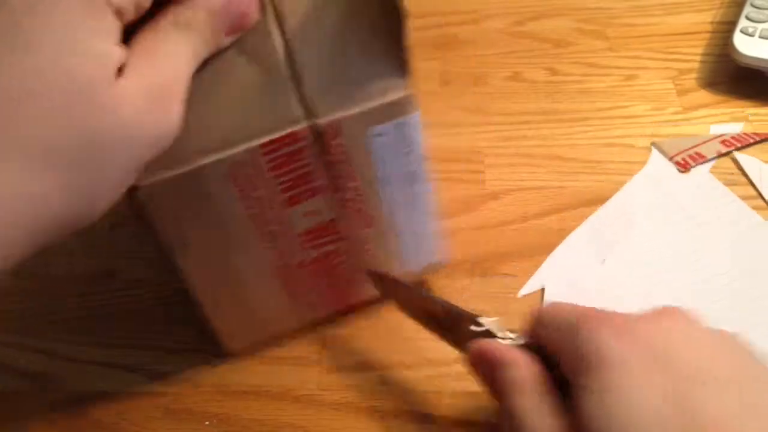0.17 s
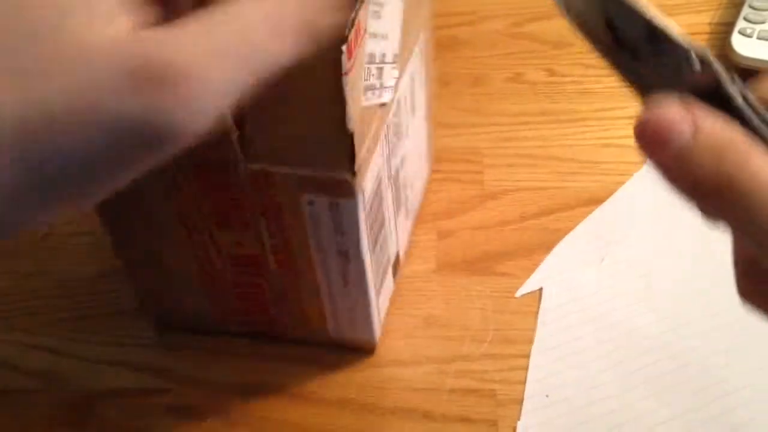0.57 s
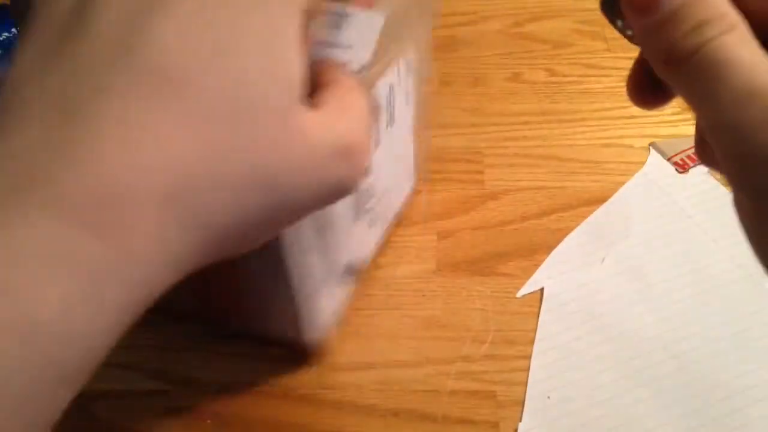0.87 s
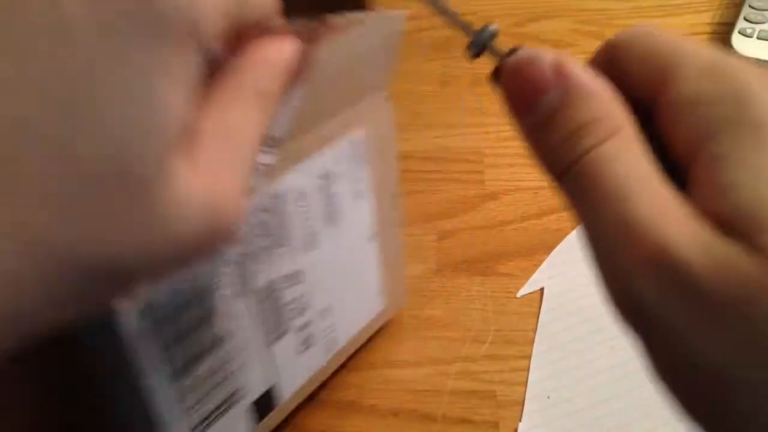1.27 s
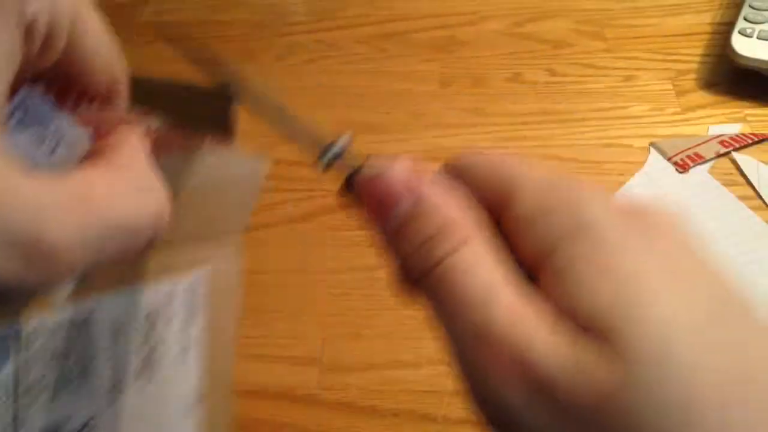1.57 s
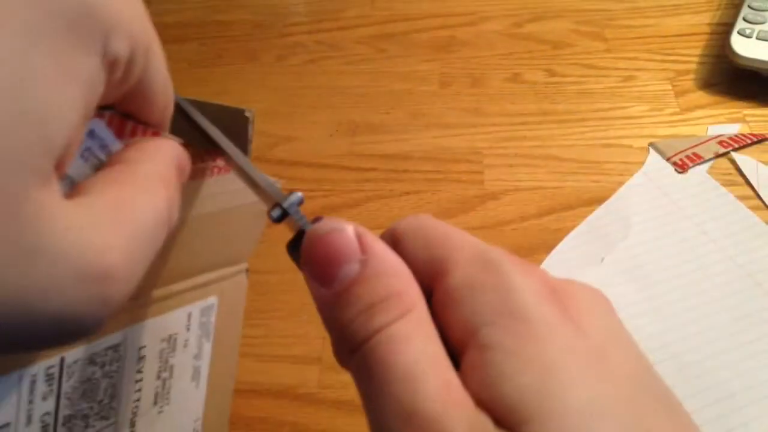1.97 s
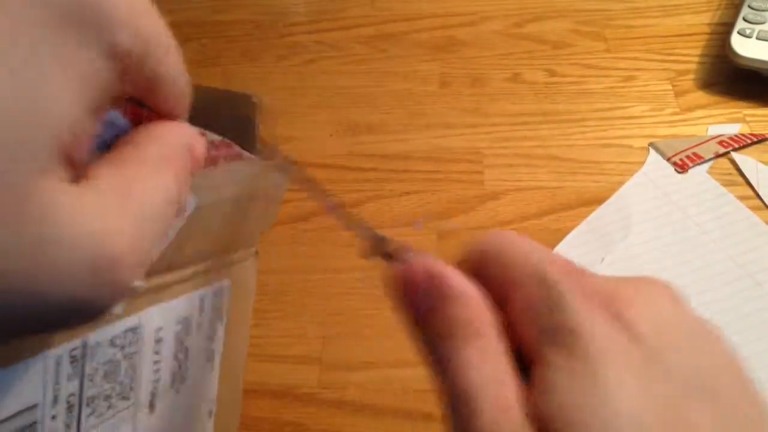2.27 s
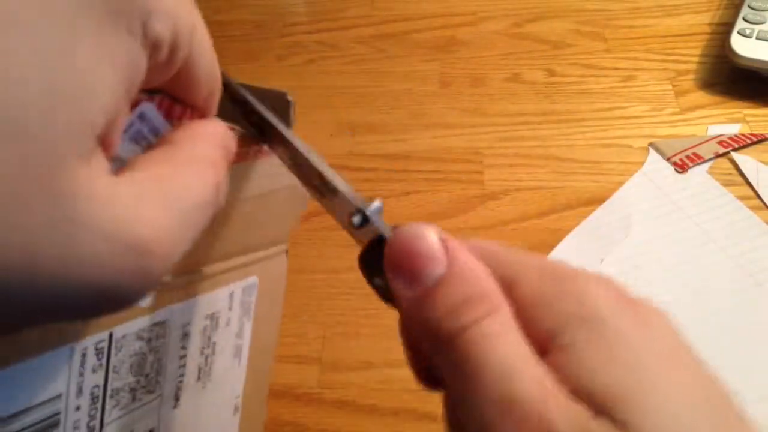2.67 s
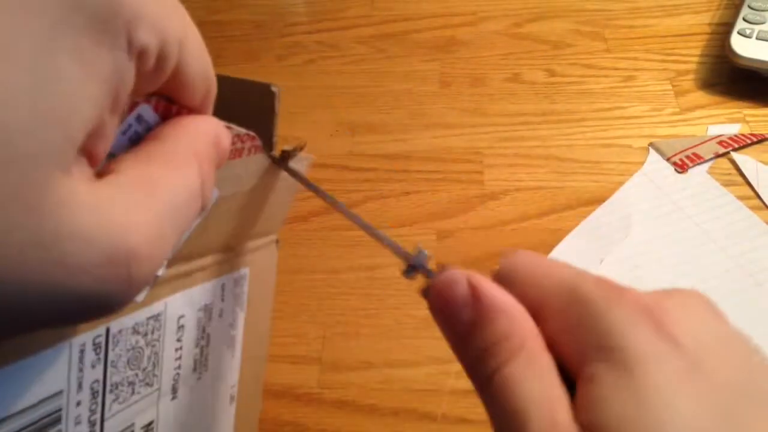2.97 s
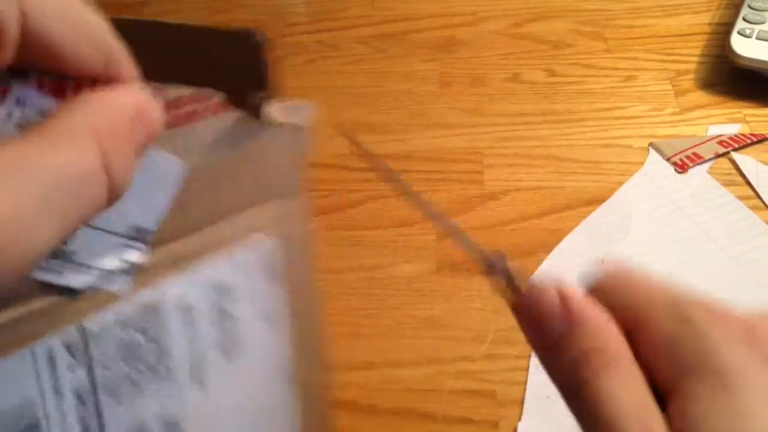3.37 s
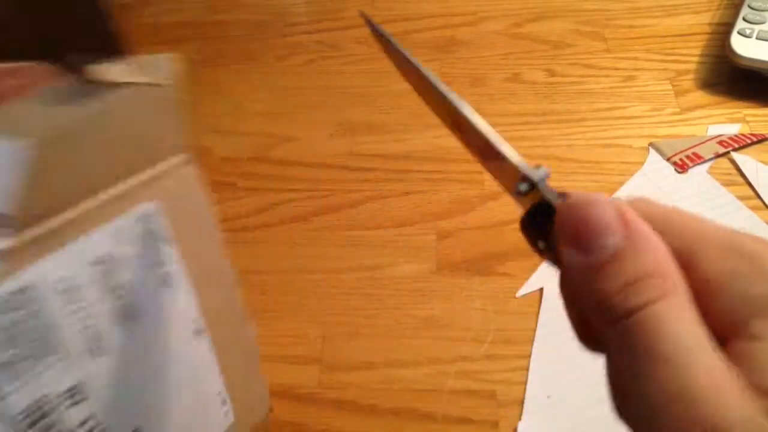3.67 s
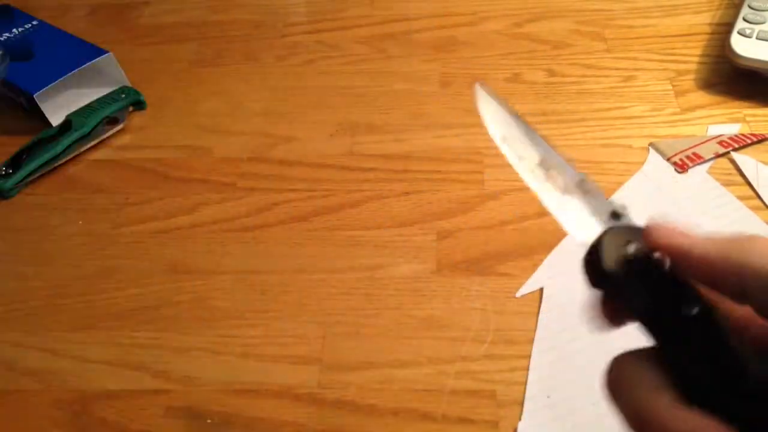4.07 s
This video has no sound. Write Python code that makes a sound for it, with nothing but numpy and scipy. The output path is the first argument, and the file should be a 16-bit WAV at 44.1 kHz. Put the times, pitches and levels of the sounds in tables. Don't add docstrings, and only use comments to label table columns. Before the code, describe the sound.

A small cardboard box is cut by hand with a knife, heard close with a short indoor echo. A crisp rip opens, followed by light scraping, dull knocks and small ticks. Past the middle, louder gritty cuts and hard snaps cluster together, then only faint scuffs and quiet room hiss remain.

```python
import sys
import numpy as np
from scipy import signal
from scipy.fft import rfft, irfft, next_fast_len
from scipy.io import wavfile

SR = 44100
rng = np.random.default_rng(int(sys.argv[2]) if len(sys.argv) > 2 else 0)


def inscribe(sig):
    pcm = np.round(np.clip(np.atleast_2d(sig).T, -1, 1) * 32767)
    wavfile.write(sys.argv[1], SR, pcm.astype(np.int16))


def ratio(d):
    e = np.asarray(d, float) / 20
    return 10 ** e


N = 185352

# pitch_hz, width_hz, level_db
HOLLOW_MODES = [(60.4, 46, -13.5), (96.5, 79, -8.5), (125, 30, -3), (152.2, 27, -3.5), (199.3, 41, 0),
                (257.6, 85, -3.5), (312, 89, -4), (406, 27, -4)]
# pitch_hz, width_hz, level_db
WALL_MODES = [(475.4, 52, 0.5), (639, 47, 4), (752, 170, -4), (980, 106, 3), (1130, 205, -3),
              (1299, 102, 2.5), (1487, 213, -4), (1798, 86, -0.5), (2095, 270, -10)]
# pitch_hz, width_hz, level_db
EDGE_MODES = [(2318, 95, 2.5), (3113, 920, -1), (3510, 590, 2), (4090, 320, 0)]
# pitch_hz, level_db (per Hz)
FIBRE_COLOUR = [(2650, -19.5), (4500, -1), (7710, -3), (8770, -4.5), (10000, -6), (14700, -9.5), (15500, 0)]


def rms_one(x):
    return x / np.sqrt(np.mean(x ** 2) + 1e-20)


def drift(rate_hz):
    r = np.exp(-2 * np.pi * rate_hz / SR)
    settle = 9000
    return rms_one(signal.lfilter([1], [1, -2 * r, r * r], rng.standard_normal(N + settle))[settle:])


def resonance(x, hz, width_hz):
    r = np.exp(-np.pi * width_hz / SR)
    feedback = [1, -2 * r * np.cos(2 * np.pi * hz / SR), r * r]
    return signal.lfilter([(1 - r * r) / 2, 0, (r * r - 1) / 2], feedback, x + 1e-18)


def body(x, modes):
    return sum((-1) ** k * ratio(db) * resonance(x, hz, width) for k, (hz, width, db) in enumerate(modes))


def coloured(x, spectrum):
    size = next_fast_len(N)
    hz, db = np.transpose(spectrum)
    bins_hz = np.arange(size // 2 + 1) * SR / size
    gain = ratio(np.interp(np.log(bins_hz + 1), np.log(hz), db))
    return irfft(rfft(x, size) * gain, size)[:N]


def flexing():
    # start_s, hold_s, force_db
    squeezes = [(0.0, 0.1, -53), (0.217, .13, -48), (0.564, .02, -59), (0.696, .02, -51),
                (0.77, .14, -50.5), (0.997, 0.21, -51.5), (1.506, 0.094, -57), (1.7, .1, -67),
                (1.894, .03, -58.5), (2.17, .02, -48), (2.215, 0.043, -33.5), (2.314, .01, -35.5),
                (2.454, 0.015, -47.5), (2.8, .03, -42.5), (3.064, .01, -56), (3.238, .02, -38.5),
                (3.68, .04, -82)]
    rise_db_per_s, fall_db_per_s, rest_db = 216, 296.5, -78
    t = np.arange(N) / SR
    force_db = np.full(N, float(rest_db))
    for start, hold, db in squeezes:
        rising = rise_db_per_s * np.maximum(start - t, 0)
        falling = fall_db_per_s * np.maximum(t - start - abs(hold), 0)
        force_db = np.maximum(force_db, db - rising - falling)
    return ratio(force_db)


def hush():
    # pitch_hz, level_db
    air_colour = [(18, -64), (30, -26.5), (192, 1), (767, -13.5), (874, -9.5), (2180, -12.5), (4420, -16),
                  (6540, -18.5), (15500, -20)]
    air_db, rumble_db, rumble_top_hz = -63.5, -38, 90
    air = rms_one(coloured(rng.standard_normal(N), air_colour))
    low_pass = signal.butter(2, rumble_top_hz, fs=SR, output="sos")
    rumble = rms_one(signal.sosfilt(low_pass, rng.standard_normal(N)))
    rumble_level = ratio(rumble_db + 2.1 * drift(6.6)) * flexing() ** 0.5
    return ratio(air_db) * air + rumble_level * rumble


def room(x):
    t60_s, dulling_hz = 0.36, 8200
    size = next_fast_len(N + SR)
    hz = np.arange(size // 2 + 1) * SR / size
    tail = 0
    for k, lag_s in enumerate(rng.uniform(.008, .035, 10)):
        loss = ratio(-60 * lag_s / t60_s * (2.5 + hz / dulling_hz))
        loop = loss * np.exp(-2j * np.pi * hz * lag_s)
        tail = tail + (-1) ** k * loop / (1 - loop)
    for lag_s in (.0013, .0029, .0047):
        late = np.exp(-2j * np.pi * hz * lag_s)
        tail = tail * (late - .6) / (1 - .6 * late)
    return irfft(rfft(x, size) * tail, size)[:N]


def squeaks():
    # centre_s, length_s, pitch_hz, level_db
    squeak_table = [(0.092, 0.046, 3450, -48.5), (.133, 0.018, 3500, -41), (.135, .019, 1750, -47),
                    (0.093, 0.063, 630, -48), (.286, 0.0067, 2880, -43), (0.345, 0.004, 1690, -27),
                    (0.361, .028, 1790, -41.5), (0.404, 0.024, 1930, -43.5), (0.463, 0.043, 1830, -56),
                    (0.618, 0.04, 2320, -59.5), (0.845, .0088, 1790, -50), (1.085, 0.0082, 2840, -50.5),
                    (1.136, 0.007, 122.8, -29.5), (1.744, 0.0036, 362, -30.5), (1.824, 0.023, 610, -59),
                    (2.247, 0.026, 201, -29.5), (2.339, 0.0035, 1130, -19), (2.342, 0.0025, 4200, -27),
                    (2.345, .011, 1680, -28.5), (2.349, 0.03, 708, -33.5), (2.6608, 0.00062, 1406, -22),
                    (2.6603, .0014, 3700, -43), (2.662, 0.0011, 516, -19), (2.665, 0.0071, 310, -30.5),
                    (2.808, .016, 372, -28.5), (2.986, 0.0058, 1750, -31.5), (3.234, 0.016, 8100, -41),
                    (3.308, .012, 622, -30), (3.248, 0.0061, 966, -33), (3.432, .014, 940, -55),
                    (3.914, 0.0069, 2110, -51.5)]
    t, out, noise = np.arange(N) / SR, np.zeros(N), rng.standard_normal(N)
    for s, length, hz, db in squeak_table:
        at = slice(max(round((s - .1) * SR), 0), round((s + .1) * SR))
        tone = resonance(resonance(noise[at], hz, .2 * hz), hz, .2 * hz)
        swell = np.exp(-((t[at] - s) / length) ** 2)
        squeak = tone * swell
        out[at] += ratio(db) * squeak * np.sqrt(np.sum(swell ** 2) / np.sum(squeak ** 2))
    return out


def contacts(table, shape, push_share, boom_gain_db, fibre_gain_db, fibre_power, cut_ratio):
    size = int(.14 * SR)
    t = np.arange(size) / SR
    rattles = rng.standard_normal((len(table), size)) * ratio(1.5 * drift(150)[:size])
    strengths_db = rng.normal(0, 2.5, (len(table), len(HOLLOW_MODES)))
    out, hiss = np.zeros((2, N + size))
    push = np.sin(np.pi * np.clip(t / 0.0024, 0, 1)) ** 2
    dull = signal.butter(2, 600, fs=SR, output="sos")
    for row, rattle, strength in zip(table, rattles, strengths_db):
        s, wall_db, boom_db, fibre_db, hz, length = row
        at = slice(round(s * SR), round(s * SR) + size)
        swell = shape(t, np.clip(length, .003, .1))
        force = rattle * swell

        soft = signal.butter(3, min(cut_ratio * hz, 4000), fs=SR, output="sos")
        grip = 1.1 * resonance(force, hz, hz * 0.17)
        broad = 0.057 * resonance(force, 1420, 2500)
        ring = signal.sosfilt(soft, 0.51 * body(force, WALL_MODES) + grip + broad)
        out[at] += ratio(wall_db - 2.5) * ring / np.abs(ring).max()

        panels = [(f, width, db + extra) for (f, width, db), extra in zip(HOLLOW_MODES, strength)]
        boom = signal.sosfilt(dull, body(push_share * push + force, panels))
        out[at] += ratio(boom_db + boom_gain_db) * boom / np.abs(boom).max()

        hiss[at] += ratio(fibre_db + fibre_gain_db) * rattle * swell ** fibre_power
    bright = coloured(hiss[:N], FIBRE_COLOUR) + ratio(5.5) * body(hiss[:N], EDGE_MODES)
    return out[:N] + bright / np.std(coloured(rattles.ravel(), FIBRE_COLOUR))


def knock_rows():
    # start_s, strength_db, hollow_weight_db, grit_db
    bumps = [(0.591, -47, 5, -11), (0.632, -41.5, 2, -15), (0.653, -44, 1, -28), (.78, -43, 12.5, -19),
             (0.8, -40.5, 10.5, -16), (.823, -28, -0.5, -16), (.853, -47, 8.5, -25), (1.026, -33, -3, -42),
             (1.04, -32.5, -2, -13), (1.1245, -23, -4, -15.5), (1.147, -30, -9.5, -11),
             (1.459, -45, 10, -21), (1.49, -41.5, -1.5, -19), (3.376, -40, 3, -19),
             (3.563, -55.5, 0.5, -14), (3.952, -41.5, -19, -17.5)]
    # start_s, strength_db, pitch_hz
    ticks = [(0.432, -36, 815), (1.218, -41, 595), (1.243, -34.5, 534), (1.269, -36.5, 900),
             (1.289, -35.5, 865), (1.309, -38, 704), (1.328, -42, 457), (1.355, -41.5, 724),
             (1.472, -38, 840), (1.543, -48, 920), (1.559, -41, 880), (1.939, -49.5, 450),
             (2.399, -32, 684), (2.499, -48, 1230), (2.833, -25, 436), (3.779, -44, 670), (3.894, -42, 587),
             (4.012, -70, 660)]
    # start_s, strength_db, pitch_hz,
    # grit_db, dying_s
    catches = [(1.737, -25, 339, -32, 0.03), (2.29, -26, 500, -9, 0.023), (2.3, -15.5, 514, -36, .012),
               (2.34, -18.5, 1540, -6, 0.042), (2.374, -23, 426, -26, 0.022),
               (2.6582, -11.5, 608, -36.5, 0.023), (2.947, -23, 1100, -13.5, 0.049),
               (3.1653, -19, 930, -11.5, 0.014), (3.243, -13.5, 890, -11.5, 0.01),
               (3.298, -21.5, 570, -11.5, 0.006), (3.402, -29.5, 844, -13, 0.025)]
    rows = [(s, db, db + weight, db + grit, 517, 0.13) for s, db, weight, grit in bumps]
    rows += [(s, db, db - 10, db - 22.5, hz, 0.03) for s, db, hz in ticks]
    rows += [(s, db, -18.5 + 0.71 * db, db + grit, hz, dying) for s, db, hz, grit, dying in catches]
    return sorted(rows)


def knocks():
    def shape(t, dying_s):
        jolt = 2.2 * np.exp(-t / 0.00027)
        return np.clip(t / 0.00066, 0, 1) * (ratio(-60 * t / dying_s) + jolt)

    return contacts(knock_rows(), shape, push_share=9.0, boom_gain_db=2.0, fibre_gain_db=3,
                    fibre_power=1.0, cut_ratio=3.3)


def rasp_rows():
    # start_s, strength_db, hollow_weight_db, grit_db
    drags = [(.154, -46.5, -11, 3.5), (0.728, -35.5, -14, -6.5), (0.75, -31, 3, -13.5),
             (0.959, -36, -23, -30), (1.04, -45, 13, -19), (1.095, -48, 8, -1.5), (1.153, -32.5, -24, -29),
             (2.096, -27.5, -9, -17.5), (2.266, -20, -9.5, -9.5), (2.746, -39, 3, -10), (2.767, -38, 6, -7),
             (2.788, -22, -2, -12.5), (2.875, -29, -25, -12.5), (2.93, -21, -2, -10),
             (2.975, -18.5, -5.5, -13), (3.201, -34, -19, -5), (3.232, -15, -10.5, -17),
             (3.293, -29, -5.5, -13), (3.866, -47.5, -13, -24), (3.932, -42.5, -0.5, -15)]
    # start_s, strength_db, pitch_hz, grit_db, length_s
    tears = [(0.122, -34, 1810, -8.5, 0.024), (0.287, -16.5, 1760, -7.5, 0.021),
             (0.312, -20, 2480, -17, 0.026), (0.35, -28, 1740, -31, 0.02), (0.661, -44.5, 1300, -2, 0.025),
             (0.995, -34.5, 1050, -14, 0.02), (1.893, -49.5, 1440, -15.5, 0.035),
             (2.061, -36.5, 1380, -17.5, 0.024), (2.129, -39, 940, 0, 0.0057),
             (2.179, -21.5, 1430, -10.5, 0.012), (2.218, -21.5, 1250, -14, 0.038),
             (2.33, -24.5, 1130, -13, 0.0086), (2.857, -28.5, 950, -18, 0.021),
             (3.08, -30, 1120, -8.5, 0.03), (3.221, -22, 1420, -10.5, 0.021),
             (3.737, -43.5, 1620, -12.5, .028), (3.904, -49.5, 2050, -8, 0.02)]
    rows = [(s, db, db + weight, db + grit, 463, 0.01506) for s, db, weight, grit in drags]
    for s, db, hz, grit, length in tears:
        weight = -5 - 7.5 * np.log2(hz / 1000)
        rows.append((s, db, db + weight, db + grit, hz, length))
    return sorted(rows)


def rasps():
    def shape(t, length_s):
        return np.clip(t / 0.00083, 0, 1) * np.exp(-np.maximum(t - length_s, 0) / 0.0034)

    return contacts(rasp_rows(), shape, push_share=0.42, boom_gain_db=1.5, fibre_gain_db=-4.0,
                    fibre_power=0.41, cut_ratio=6.3)


def grains(per_s, spread_db, clump_db, clump_rate):
    sizes = ratio(spread_db * np.minimum(rng.exponential(1, N), 5)) * rng.choice([-1, 1], N)
    snapping = rng.random(N) < per_s / SR
    return rms_one(sizes * snapping * ratio(clump_db * drift(clump_rate)))


def in_time(rows):
    s, *columns = np.transpose(rows)
    t = np.arange(N) / SR
    fade_in = (t - s[0] + .012) / .012
    fade_out = (s[-1] + .03 - t) / .03
    gate = np.clip(np.minimum(fade_in, fade_out), 0, 1)
    return np.array([gate * ratio(np.interp(t, s, c)) for c in columns])


def stroke_layers(rows):
    return in_time([(s, db, db - 6 + 0.7 * bite, db + bite) for s, db, bite in rows])


def driven(drive, gain, colour):
    return colour(drive * gain) / np.std(colour(drive))


def crackle(spectrum, cycles, even_share):
    pitches_hz = np.geomspace(2300, 14500, 14)
    dealt = np.repeat(rng.integers(0, len(pitches_hz), N // 64 + 1), 64)[:N]

    def colour(force):
        ringing = sum(resonance(force * (dealt == k), hz, hz / cycles) for k, hz in enumerate(pitches_hz))
        return coloured(even_share * force + np.sqrt(cycles) * ringing, spectrum)

    return colour


def tearing():
    # time_s, pressure_db, bite_db
    strokes = [
        [(0.0, -59, -7), (0.04, -49, -6), (0.114, -42.5, -4.7), (0.2, -53.5, 0), (0.27, -50, -6)],
        [(0.3, -32, -2.5), (0.398, -46, -5.5), (0.446, -57.5, 0), (0.48, -67.5, 2)],
        [(0.52, -61.5, -2), (0.652, -54, -2.7), (0.93, -61, -1.2), (1.034, -51, -5), (1.115, -54, -2),
         (1.15, -43, -14), (1.2, -52.5, -7), (1.33, -61.5, -7)],
        [(1.46, -65, 1.5), (1.53, -67, 0), (1.59, -63.5, 2)],
        [(2.03, -68, -30), (2.126, -42, -8.5), (2.244, -37, 1.4), (2.274, -26.5, -3.5), (2.316, -40, -7),
         (2.392, -52, 0), (2.5, -61.5, -7)],
        [(2.67, -50, -30), (2.73, -51.5, -35), (2.774, -44.5, -5), (2.824, -33.5, -6), (2.905, -51, -1),
         (3.066, -50, -0.5), (3.15, -56.5, -12)],
        [(3.18, -41, -6), (3.274, -51, -12), (3.394, -61.5, 3.5), (3.47, -63.5, -8)],
        [(3.72, -61, -9), (3.864, -70, -6), (4.03, -93, 9)],
    ]
    wall, edge, fibre = sum(stroke_layers(rows) for rows in strokes)
    snaps = grains(9800, spread_db=2.5, clump_db=2.0, clump_rate=30)
    slips = grains(1500, spread_db=2.0, clump_db=-5.0, clump_rate=39) + 0.12 * snaps
    lumps = grains(300, spread_db=1.0, clump_db=7.0, clump_rate=18) + 0.53 * slips
    hollow_sound = driven(lumps, flexing(), lambda x: body(x, HOLLOW_MODES))
    wall_sound = driven(slips, wall, lambda x: body(x, WALL_MODES))
    edge_sound = driven(snaps + 2.2 * slips, edge, lambda x: body(x, EDGE_MODES))
    fibre_sound = driven(snaps, fibre, crackle(FIBRE_COLOUR, cycles=24.0, even_share=3.4))
    return hollow_sound + wall_sound + edge_sound + fibre_sound


def scene():
    box = tearing() + knocks() + rasps() + squeaks()
    return (box + ratio(-14.5) * room(box) + hush())[None]


def band_limit(x):
    return signal.sosfilt(signal.butter(12, 16030, fs=SR, output="sos"), x)


def record(dry):
    thin = signal.sosfilt(signal.butter(2, 45, "high", fs=SR, output="sos"), dry)
    cut = signal.sosfilt(signal.cheby2(12, 70, 16150, fs=SR, output="sos"), thin)
    return band_limit(cut)


dry = scene()
out = record(dry)
inscribe(out)
```